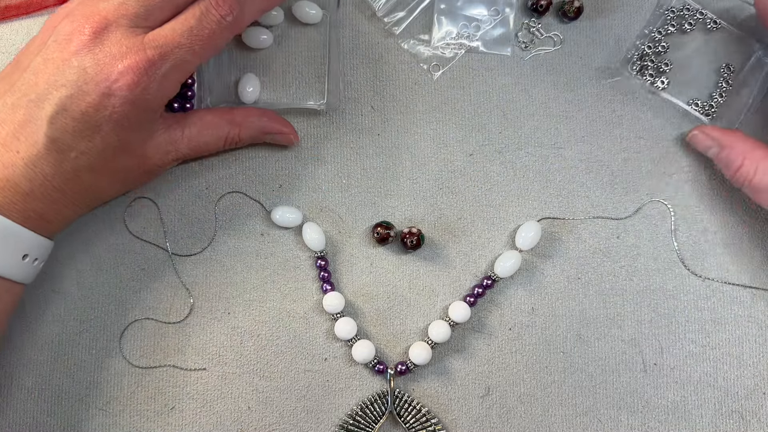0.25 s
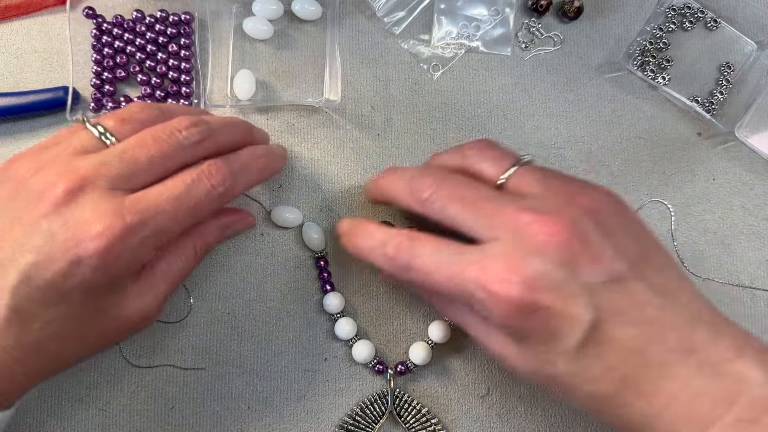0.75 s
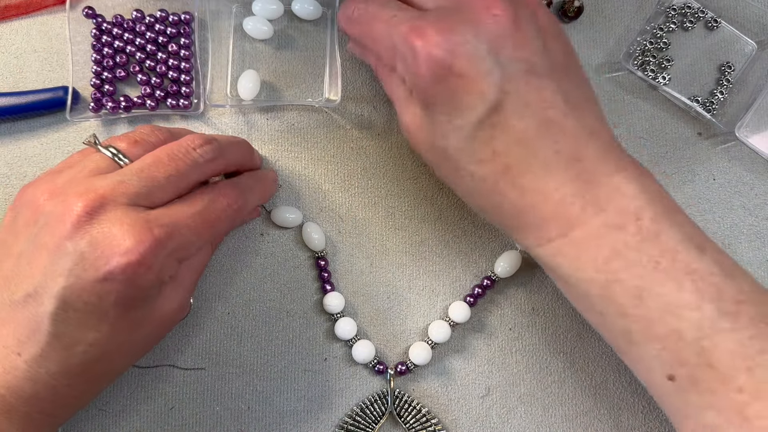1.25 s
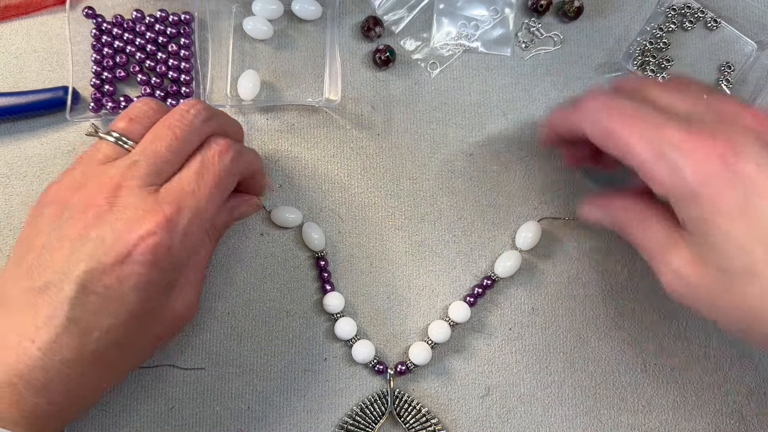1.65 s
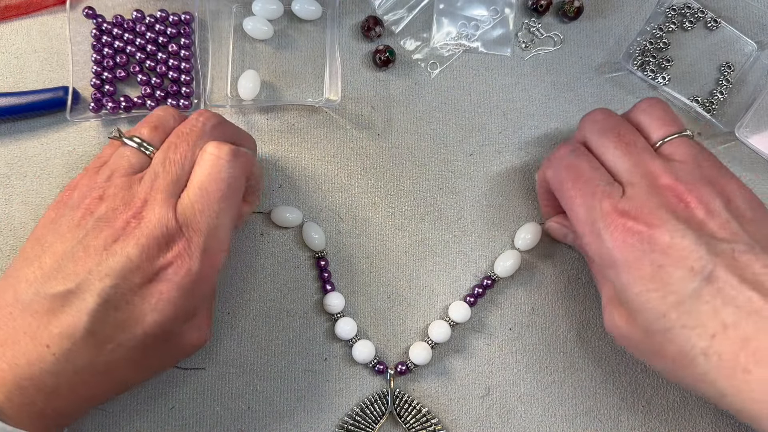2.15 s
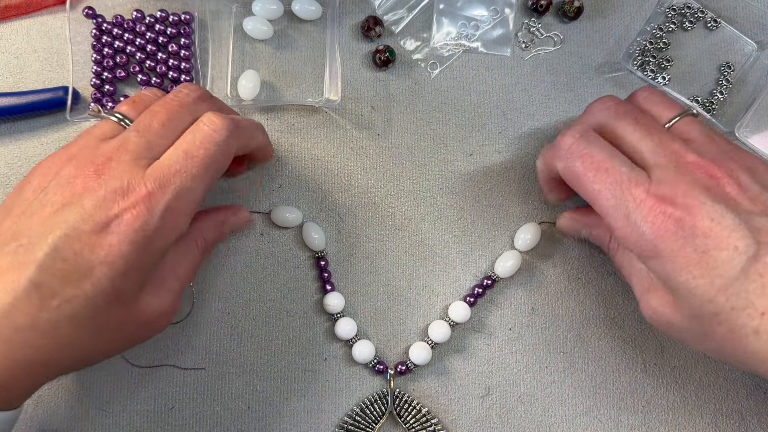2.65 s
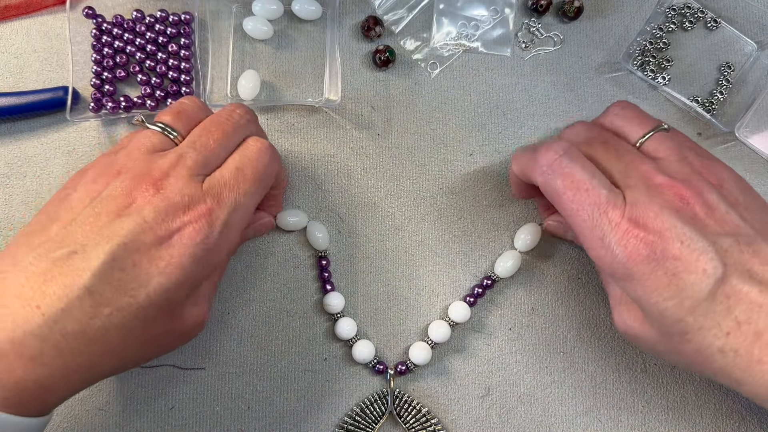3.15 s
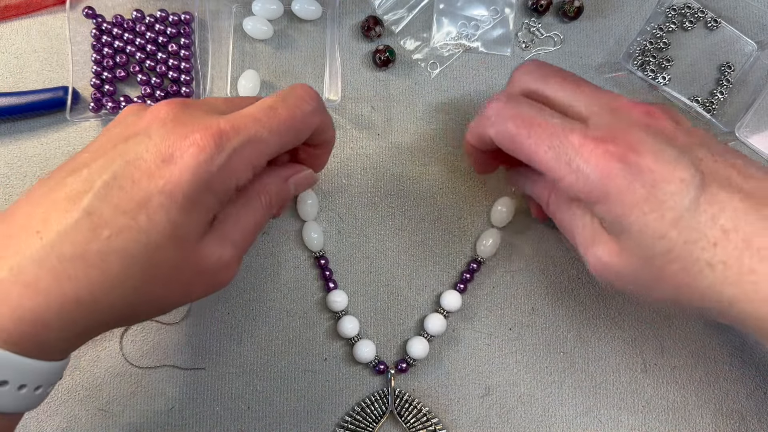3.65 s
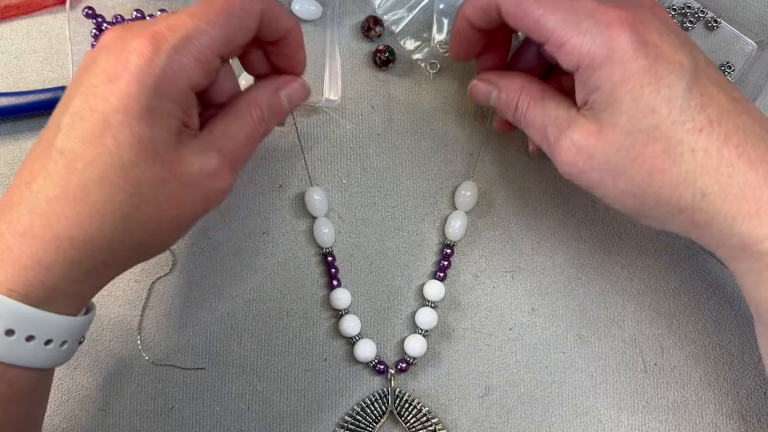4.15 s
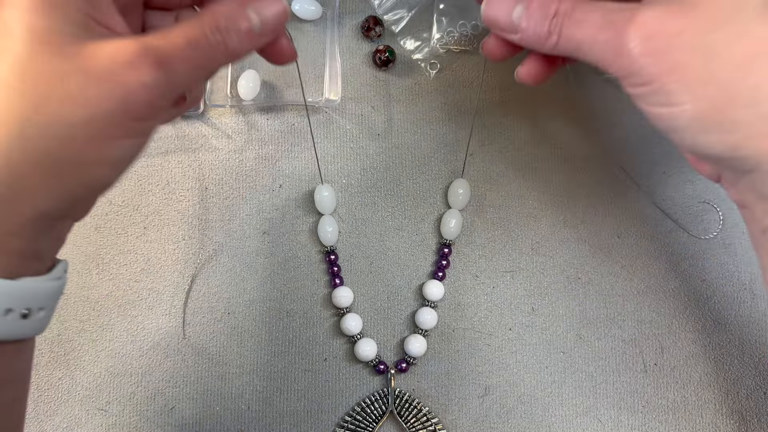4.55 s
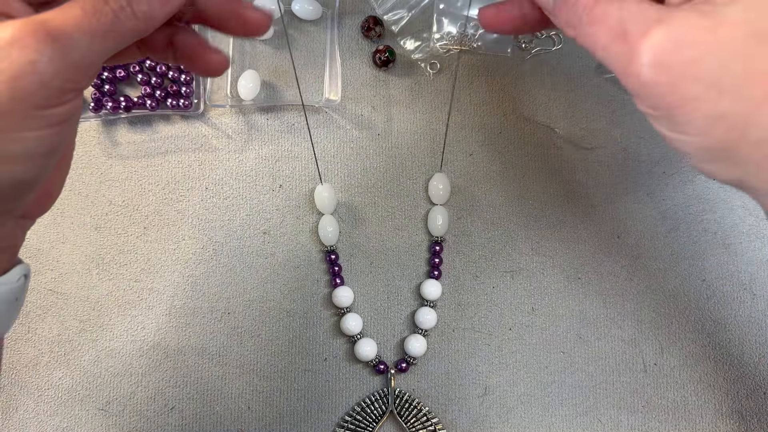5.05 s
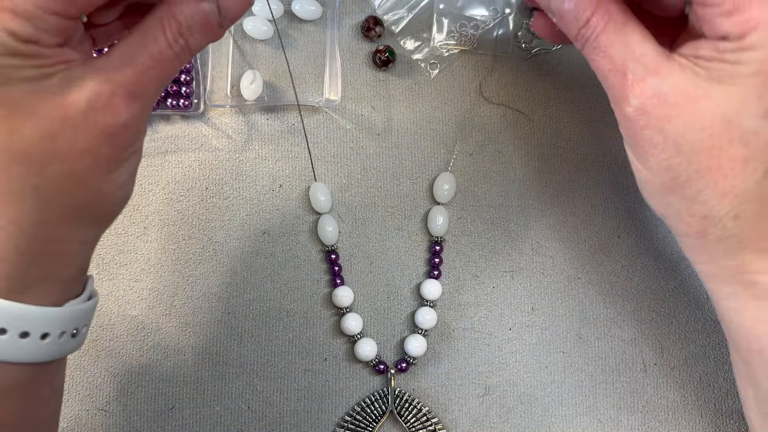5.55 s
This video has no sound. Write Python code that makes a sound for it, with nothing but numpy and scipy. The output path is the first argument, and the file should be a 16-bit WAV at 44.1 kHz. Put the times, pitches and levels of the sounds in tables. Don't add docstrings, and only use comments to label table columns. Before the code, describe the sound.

Close, quiet tabletop beadwork: bright tray clatter, muffled hand bumps and rubs, a few knocks, then isolated delicate ticks above faint machine hum.

```python
import sys
import numpy as np
from scipy import signal
from scipy.fft import rfft, irfft, next_fast_len
from scipy.io import wavfile
from scipy.ndimage import uniform_filter1d, map_coordinates

SR = 44100
rng = np.random.default_rng(int(sys.argv[2]) if len(sys.argv) > 2 else 0)


def volts_from_db(level):
    exponent = np.asarray(level, float) / 20
    return 10 ** exponent


def put_to_file(sound):
    columns = np.atleast_2d(sound).T
    safe = np.clip(columns, -1, 1)
    whole_steps = np.round(safe * 32767)
    wavfile.write(sys.argv[1], SR, whole_steps.astype(np.int16))


N = 256163


def unit(x):
    return x / np.sqrt(np.mean(x ** 2) + 1e-20)


def along(points, hz):
    f, value = np.transpose(points)
    return np.interp(np.log(hz + 1), np.log(f + 1), value)


def wobble(rate):
    return map_coordinates(rng.standard_normal(int(N * rate / SR) + 4), [np.arange(N) * rate / SR])


def filtered(x, response):
    size = next_fast_len(N + SR // 8)
    return irfft(rfft(x, size) * response(np.fft.rfftfreq(size, 1 / SR)), size)[..., :N]


def ringing(x, modes):
    def response(f):
        total = 0
        for k, (center, width, db) in enumerate(modes):
            loss = 1j * f * width
            total = total + (-1) ** k * volts_from_db(db) * loss / (center * center - f * f + loss)
        return total / np.sqrt(np.mean(abs(total) ** 2))
    return filtered(x, response)


def steady(modes, ms):
    x = ringing(rng.standard_normal((2, N)), modes)
    x = signal.sosfilt(signal.butter(2, 1200, fs=SR, output="sos"), x)
    power = abs(uniform_filter1d(x ** 2, round(ms * SR / 1000), axis=1))
    return x / np.sqrt(power + 1e-12)


def held(starts, holds, levels_db, rise, fall):
    t = np.arange(0, N / SR + 1 / 1000, 1 / 1000)
    gain = 0
    for s, hold, db in zip(starts, holds, levels_db):
        below_db = rise * np.maximum(s - t, 0) + fall * np.maximum(t - s - hold, 0)
        gain = gain + volts_from_db(db - below_db)
    return np.interp(np.arange(N) / SR, t, gain)


def swells(times, levels_db, spreads_ms, rise):
    envelope, t = np.zeros(N + 6000), np.arange(6000) / SR
    for s, db, ms in zip(times, levels_db, spreads_ms):
        u = t / (max(ms, .2) / 1000)
        envelope[round(s * SR):][:len(t)] += volts_from_db(db) * (1 - np.exp(-u / rise)) * np.exp(-u)
    return envelope[:N]


def bursts(times, levels_db, spreads_ms, grain_db):
    lumps = volts_from_db(grain_db * wobble(900))
    return swells(times, levels_db, spreads_ms, rise=0.34) * lumps * rng.standard_normal((2, N))


def pushes(times, levels_db, ms):
    force = np.zeros(N)
    force[np.round(times * SR).astype(int)] = volts_from_db(levels_db)
    force = force + .5 * np.roll(force, round(0.00355 * SR))
    u = np.arange(400) / SR / (ms / 1000)
    return signal.fftconvolve(force, u * u * np.exp(-u))[:N]


def pings(times, levels_db, pitches_hz, t60, attack):
    out, t = np.zeros(N + 6000), np.arange(6000) / SR
    for s, db, hz in zip(times, levels_db, pitches_hz):
        onset = 1 - np.exp(-(t / attack) ** 2)
        out[round(s * SR):][:len(t)] += volts_from_db(db - 60 * t / t60) * onset * np.sin(2 * np.pi * hz * t)
    return out[:N]


# pitch_hz, level_db (rms)
MACHINE_TONES = [(55.9, -50.5), (167.7, -65)]
# pitch_hz, level_db (rms), start_s
JOINING_TONE = (204.6, -59.5, 4.5)
# freq_hz, density_db (per Hz)
ROOM_NOISE = [(20, -40), (45, -17), (70, -11), (90, -19), (135, -13.5), (190, -20), (240, -13.5),
              (320, -27.5), (900, -32), (1700, -40.5), (4000, -56), (6900, -54.5), (9300, -69),
              (14500, -60.5)]


def hum():
    t = np.arange(N) / SR
    tones = 0
    for hz, db in MACHINE_TONES:
        level = volts_from_db(db + 3.5 + 1.2 * wobble(2.956))
        tones = tones + level * np.sin(2 * np.pi * hz * t + 0.14 * wobble(2.5))
    hz, db, start = JOINING_TONE
    fade_in = np.clip((t - start) / .3, 0, 1)
    tones = tones + volts_from_db(db + 3 + 1.5 * wobble(3)) * fade_in * np.sin(2 * np.pi * hz * t)
    air = unit(filtered(rng.standard_normal((2, N)), lambda f: volts_from_db(along(ROOM_NOISE, f))))
    return tones + volts_from_db(-55.5 + .8 * wobble(1.3)) * air


# freq_hz, t60_s
ROOM_DECAY = [(150, 0.27), (1000, 0.32), (5000, 0.37), (10000, 0.23), (15000, 0.19)]


def room(x):
    out, step = np.zeros((2, N + 2 * SR)), SR // 4
    for start in range(0, N, step):
        hz, t, z = signal.stft(rng.standard_normal((2, SR // 3)), SR, nperseg=256)
        decay = volts_from_db(-60 * t / along(ROOM_DECAY, hz)[:, None])
        tail = signal.istft(z * decay, SR, nperseg=256)[1]
        wet = signal.fftconvolve(x[:, start:start + step], tail / np.linalg.norm(tail[0]), axes=1)
        out[:, start + 150:][:, :wet.shape[1]] += wet
    return out[:, :N]


# start_s, boom_db, rub_db (re boom)
WRIST_LANDINGS = [(0.774, -40.5, -7.5), (0.797, -34, -11), (0.824, -39.5, -1.5), (1.437, -49.5, 3),
                  (1.685, -40, -17), (1.879, -51, -16), (1.993, -39, -16), (2.68, -52.5, 5),
                  (2.783, -49, -22), (2.819, -41, -14), (2.839, -46.5, -17), (2.874, -44.5, -11)]
# start_s, boom_db, rub_db (re boom)
WRIST_SLIPS = [(0.009, -43.5, -5.5), (0.047, -51.5, 7.5), (0.08, -45, -16.5), (0.846, -41.5, -25),
               (0.888, -40, -3), (0.913, -47, 5.5), (1.476, -41.5, -0.5), (1.497, -44, -2), (1.52, -38, -1),
               (1.539, -41.5, -11), (1.563, -42, -17), (1.6, -38.5, -11.5), (1.623, -44.5, -19),
               (1.734, -38.5, -6.5), (1.768, -40.5, -24), (2.036, -38, -9.5), (2.064, -52, -15),
               (2.717, -36.5, -19), (2.75, -41, -31), (2.942, -40.5, -14), (3.312, -50, -19),
               (3.345, -42, -5.5), (3.373, -41.5, -3), (3.398, -45, -16), (3.467, -42, -8),
               (3.58, -35.5, -6), (3.605, -55, -13)]
# freq_hz, width_hz, level_db
TABLE_TOP = [(211, 24.8, -2.5), (245.4, 25.2, -1.5), (277, 17.2, -5), (351.7, 29.6, -8)]
# freq_hz, width_hz, level_db
DEEPEST_MODE = [(130.4, 4.1, 0)]
# freq_hz, width_hz, level_db
CLOTHED_BOARD = [(417, 84, 1), (650, 220, -3.5), (874, 590, -4)]


def drag():
    s, db, rub_db = np.transpose(WRIST_LANDINGS + WRIST_SLIPS)
    counts = [len(WRIST_LANDINGS), len(WRIST_SLIPS)]
    ms = np.repeat([11.6, 14.3], counts)
    deep_db = np.repeat([-1, -13], counts)
    boom = swells(s, db + 4.5, ms, rise=0.67) * steady(TABLE_TOP, ms=18)
    deep = swells(s, db + deep_db + 5, 1.64 * ms, rise=0.64) * steady(DEEPEST_MODE, ms=18)
    rub = swells(s, db + rub_db + 1.5, ms, rise=0.58) * steady(CLOTHED_BOARD, ms=6.4)
    weave = ringing(rng.standard_normal((2, N)), [(3000, 2300, 0)])
    brush = swells(s, db - 34.5, 2.0 * ms, rise=0.37) * weave
    body = filtered(boom + deep + rub, lambda f: 1 / (1 + (f / 1150) ** 10))
    return body * volts_from_db([[0], [-6]]) + brush


# start_s, knock_db, thud_db (re knock), pitch_hz
TABLE_KNOCKS = [(0.775, -44.5, 8.5, 396), (1.276, -34, -16.5, 477), (1.331, -41, -1, 430),
                (1.344, -45.5, -8, 490), (1.45, -58, 7.5, 515), (1.468, -46.5, -8.5, 553),
                (1.487, -41, -4, 403), (1.687, -46.5, -5, 537), (1.99, -45, 8.5, 790),
                (2.682, -46.5, 6, 393), (2.947, -60, 14, 528), (3.553, -26.5, -5, 910),
                (3.569, -21, -12, 790), (3.8165, -32, -1, 793), (4.056, -43, -4.5, 416),
                (4.205, -31.5, -2.5, 784), (4.392, -50, -8, 407), (4.447, -34, -3.5, 773),
                (4.588, -44, 1.5, 430), (4.987, -51.5, 8, 403)]
# freq_hz, width_hz, level_db
BARE_BOARD = [(450, 220, -2), (830, 420, 0), (1150, 350, -6), (1900, 700, -22)]
# freq_hz, width_hz, level_db
TABLE_THUD = [(134, 33, -16), (258, 200, 21), (373, 160, -7)]
# freq_hz, width_hz, level_db
HARD_EDGE = [(1360, 340, 4.5), (1990, 750, -10), (2560, 500, -21)]


def knocks():
    s, db, thud_db, hz = np.transpose(TABLE_KNOCKS)
    spot = pings(s, db + 5, hz, t60=0.02, attack=0.0014)
    board = ringing(pushes(s, db - 2, ms=0.089), BARE_BOARD)
    thud = ringing(pushes(s, db + thud_db - 8.0, ms=.25), TABLE_THUD)
    crack_db = 2.0 * (db + 22) - 44.5
    crack = ringing(bursts(s, crack_db, 0 * s + 14, grain_db=-6.0), HARD_EDGE)
    crack = signal.sosfilt(signal.butter(3, [950, 2800], "band", fs=SR, output="sos"), crack)
    return (spot + board + thud) * volts_from_db([[0], [-9]]) + crack


# start_s, held_s, bright_db, tray_db
BEAD_ROLLS = [
    (0.001, 0.02, -55.5, -52),
    (0.09, 0.28, -64.5, -58),
    (0.3, 0.012, -66.5, -68),
    (0.925, 0.026, -59, -60.5),
    (1.272, 0.0046, -69, -58.5),
    (1.33, 0.037, -84, -73),
    (5.3, 0.13, -75.5, -83.5),
]
# start_s, level_db
FINGERTIPS = [(0.81, -80), (0.876, -79.5), (1.69, -81), (1.765, -78), (1.89, -84), (1.994, -78),
              (2.05, -72), (2.42, -76), (2.546, -78), (2.628, -83.5), (3.182, -84), (3.248, -73),
              (3.325, -80.5), (3.58, -71), (3.624, -76), (5.56, -80), (5.666, -78)]
# freq_hz, width_hz, level_db
BEAD_MODES = [(8560, 1160, -3), (11120, 1800, 0.5), (13000, 1300, 4.5), (14680, 3000, 0.5)]
# freq_hz, width_hz, level_db
WALL_MODES = [(4910, 1155, -5), (6080, 760, 0), (6990, 1100, -2.5), (8190, 700, -4)]
# freq_hz, width_hz, level_db
BOX_MODES = [(1293, 254, 5.5), (1985, 362, 0), (2360, 350, 1.5), (3570, 1300, -6)]


def rustle():
    grains = unit(volts_from_db(2.2 * wobble(250) + 1.743 * wobble(36)))
    hiss = grains * rng.standard_normal((4, 2, N))
    s, hold, bright_db, tray_db = np.transpose(BEAD_ROLLS)
    beads = held(s, hold, bright_db + 0.5, rise=484, fall=420) * ringing(hiss[0], BEAD_MODES)
    tray_tone = volts_from_db(-6.0) * ringing(hiss[1], WALL_MODES) + volts_from_db(-2.0) * ringing(hiss[2], BOX_MODES[1:])
    tray = held(s, hold, tray_db, rise=484, fall=208) * tray_tone
    s, db = np.transpose(FINGERTIPS)
    touch = held(s, 0 * s + .004, db + 1.8, rise=370, fall=880) + volts_from_db(-93.5)
    return beads + tray + touch * ringing(hiss[3], [(14700, 5400, 18), (11500, 1430, -14.5)])


# start_s, level_db, pitch_hz
GLASS_RINGS = [(0.4, -29.5, 8120), (.401, -35, 4900), (0.401, -31.5, 6100), (1.3718, -49.5, 9100),
               (4.7267, -37, 6010), (5.058, -48, 6140), (5.057, -38, 14600), (5.281, -56.5, 5900),
               (5.362, -62, 6080), (5.3632, -59, 7900), (5.44, -64, 5840)]


def tinks():
    s, db, hz = np.transpose(GLASS_RINGS)
    return pings(s, db - 1, hz, t60=0.04, attack=0.00048) * volts_from_db([[0], [-4]])


# start_s, bright_db, wall_db (re bright), box_db (re bright)
TRAY_RATTLES = [(0.0074, -56, 13, -2), (0.0207, -44, -1, -11), (0.0435, -40.5, 3, -6),
                (0.0506, -33, -4, -10), (0.0578, -43.5, 2.5, -9), (0.069, -48, 6.5, -9),
                (0.1107, -27.5, -6, -10), (0.1427, -25, -1, -17.5), (0.1468, -27.5, -21, -16),
                (0.2768, -51.5, 9, 11.5), (0.2874, -48.5, -2, 0), (0.3286, -43, 1.5, 2.5),
                (0.3987, -23.5, 2, -16), (0.4014, -26, -21, -24), (0.4165, -39, -15, -6),
                (0.9355, -43.5, -3.5, -23), (0.9468, -51, 2.5, -17), (1.265, -43.5, -3.5, -14),
                (1.269, -40.5, -1.5, -7), (1.3693, -55, -3.5, -9), (4.7188, -29.5, -12.5, -27),
                (4.725, -22.5, -12, -31.5), (5.437, -48, -16.5, -21)]
# start_s, bright_db, wall_db (glass ring re bright), box_db (re bright)
WIRE_TICKS = [(0.909, -42.5, -10, -11), (0.9204, -52.5, 3, 0), (1.1432, -49.5, 1, -6),
              (1.1488, -54.5, -0.5, -9), (1.1818, -65, 11, -0.5), (1.208, -72, 19.5, 10.5),
              (2.9522, -49.5, -9, -21), (3.343, -36, -15, -24), (3.553, -53, -2.5, -1.5),
              (3.7334, -48.5, -4, -19.5), (3.8456, -50, -11, -20.5), (3.875, -41.5, -11.5, -30),
              (4.1094, -42, -9.5, -37), (4.2236, -54, -17.5, -14), (4.2374, -44.5, -7, -18),
              (4.48, -42, -12, -27), (4.5755, -58, -2, -24), (4.616, -68, -8, -14),
              (5.0562, -25, -25, -27.5), (5.0723, -45, -10.5, -20), (5.2799, -47.5, -5, -10.5),
              (5.312, -51, -6, -24), (5.332, -56, -4, -20), (5.3621, -45.5, -14, -25),
              (5.4102, -53, -19, -19), (5.5293, -65.5, 5, 14), (5.6073, -47, -14, -13),
              (5.626, -64, -10, -3)]


def clicks():
    s, db, wall_db, box_db = np.transpose(TRAY_RATTLES + WIRE_TICKS)
    ms = np.repeat([3.02, 1.32], [len(TRAY_RATTLES), len(WIRE_TICKS)])
    tick = ringing(bursts(s, db + 2.5, ms, grain_db=0.0), BEAD_MODES)
    wall = ringing(bursts(s, db + wall_db - 3, 1.89 * ms, grain_db=3.5), WALL_MODES)
    box = ringing(bursts(s, db + box_db - 1.5, 1.81 * ms, grain_db=0.5), BOX_MODES)
    return tick + wall + ringing(box, [(2135, 3900, 0)])


def scene():
    beads, glass, dull, rub = clicks(), tinks(), knocks(), drag()
    sent = volts_from_db(-10.5) * beads + volts_from_db(-18.5) * glass + volts_from_db(-11) * dull + volts_from_db(-8.0) * rub
    return beads + glass + dull + rub + room(sent) + rustle() + hum()


def roll_off(x):
    return signal.sosfilt(signal.butter(12, 17000, fs=SR, output="sos"), x)


# freq_hz, likeness (0-1)
PORT_LIKENESS = [(60, 1), (250, 0.72), (800, 0.16), (2000, 0.18), (6500, 0), (8500, 1), (11500, 0.95),
                 (15000, 1)]
# freq_hz, level_db
PORT_LEAN = [(60, 1.54), (250, 2.5), (1200, 0.5), (3500, 5), (7000, 10), (8500, 0.1), (16000, -1.5)]
# freq_hz, phase_rad
PORT_LEAD = [(60, .15), (800, -.4), (7500, .1), (8500, -.6), (10000, -2.1), (11500, -3.2), (13000, -5),
             (14500, -6.3), (15500, -6.9)]
# freq_hz, width_hz, level_db (rms)
PORT_HISS = (6670, 1440, -72)


def record(dry):
    def mix(f):
        angle = np.arccos(np.clip(along(PORT_LIKENESS, f), 0, 1)) / 2
        return np.array([np.cos(angle), np.sin(angle)])

    side = np.array([[.5], [-.5]])

    def placement(f):
        return volts_from_db(side * along(PORT_LEAN, f)) * np.exp(1j * side * along(PORT_LEAD, f))

    shared, apart = filtered(dry, mix)
    ports = filtered(np.array([shared + apart, shared - apart]), placement)
    hz, width, db = PORT_HISS
    hiss = ringing(rng.standard_normal((2, N)), [(hz, width, 0)])
    hiss = ringing(hiss, [(hz, width, 0)]) / 3
    ports = ports + volts_from_db([[db], [db - 24]]) * hiss
    ports = filtered(ports, lambda f: volts_from_db(-np.clip((f - 15750) / 15, 0, 22)))
    return roll_off(ports)


dry = scene()
out = record(dry)
put_to_file(out)
```